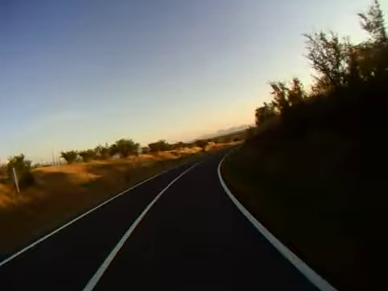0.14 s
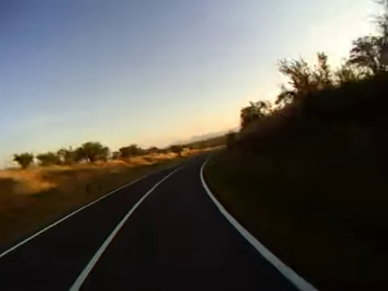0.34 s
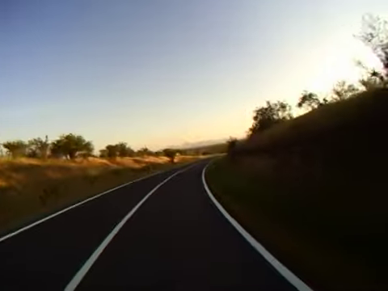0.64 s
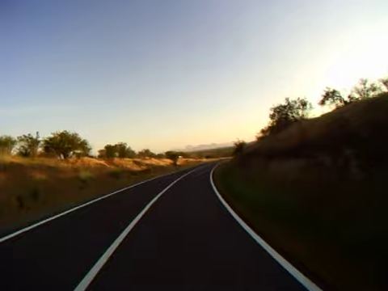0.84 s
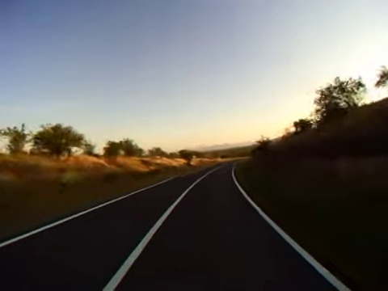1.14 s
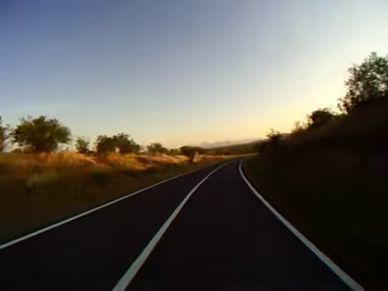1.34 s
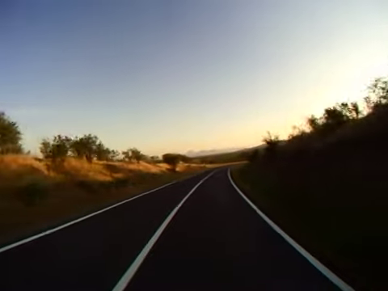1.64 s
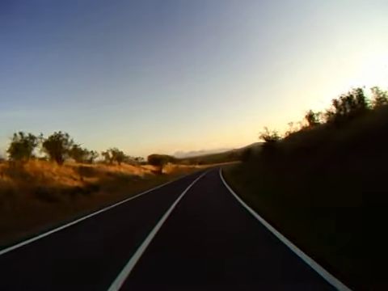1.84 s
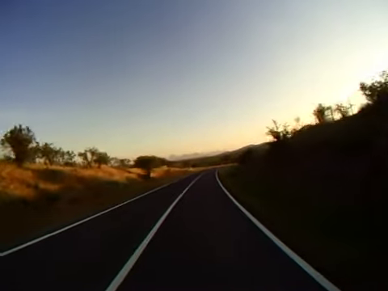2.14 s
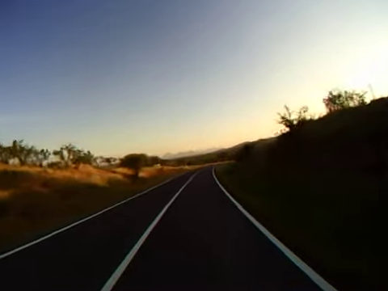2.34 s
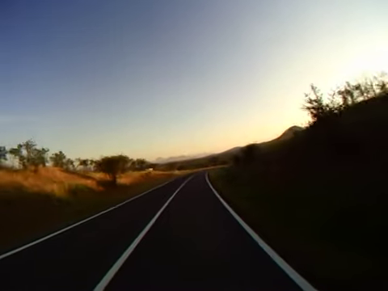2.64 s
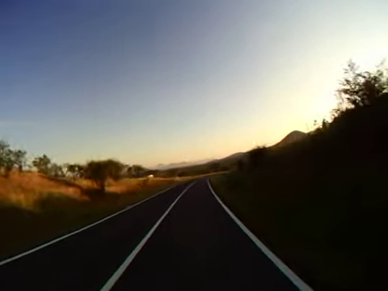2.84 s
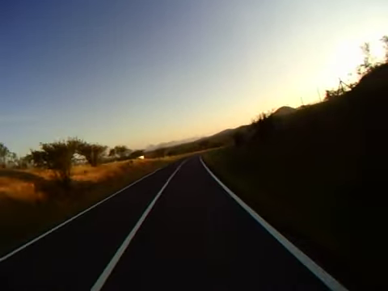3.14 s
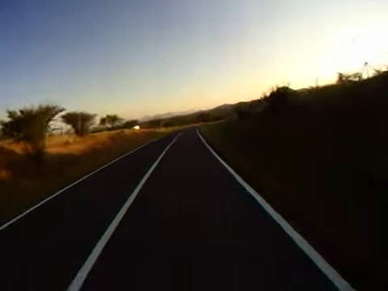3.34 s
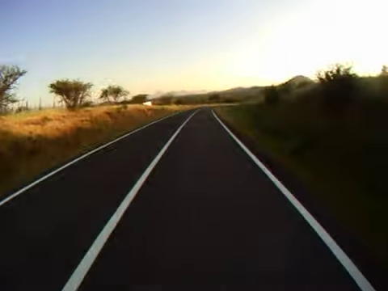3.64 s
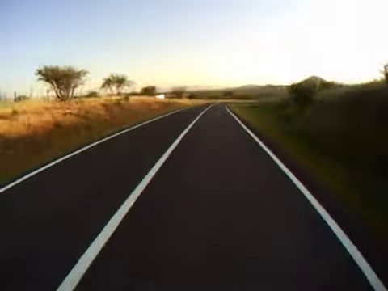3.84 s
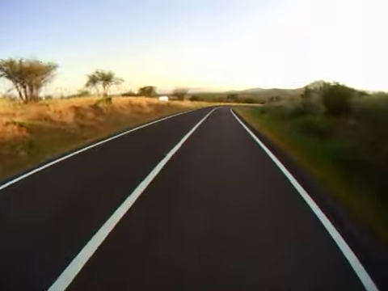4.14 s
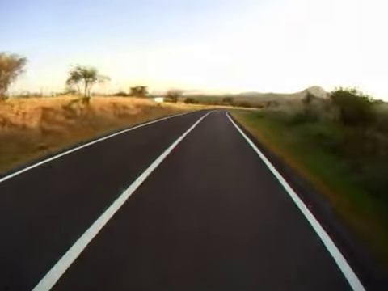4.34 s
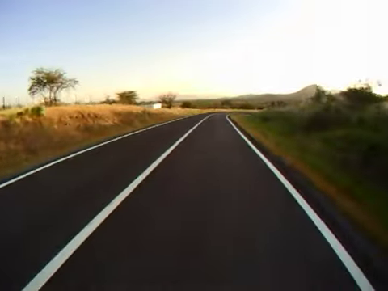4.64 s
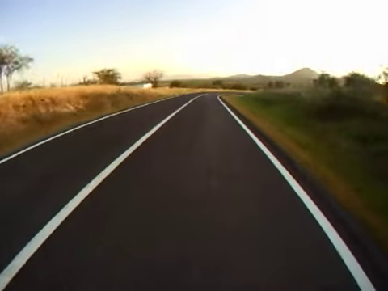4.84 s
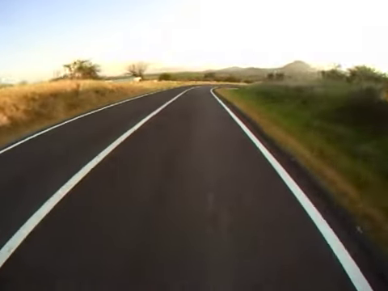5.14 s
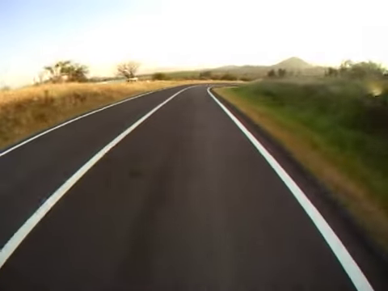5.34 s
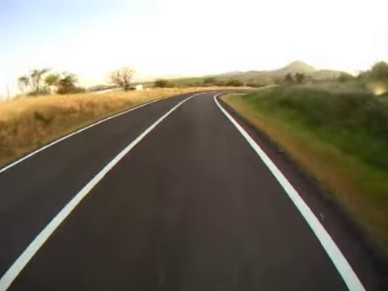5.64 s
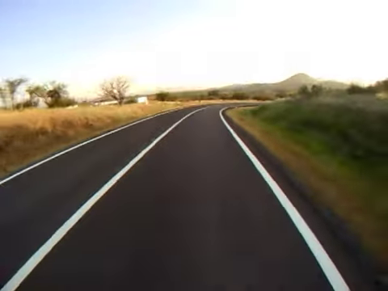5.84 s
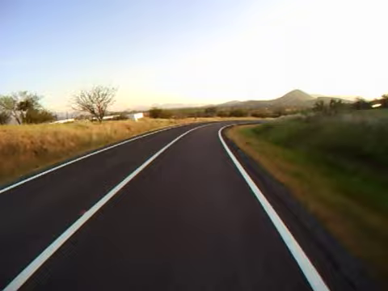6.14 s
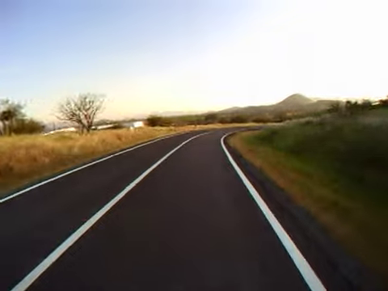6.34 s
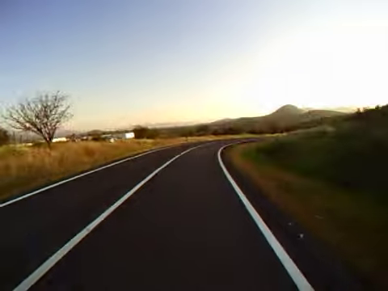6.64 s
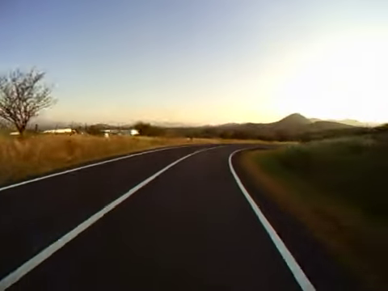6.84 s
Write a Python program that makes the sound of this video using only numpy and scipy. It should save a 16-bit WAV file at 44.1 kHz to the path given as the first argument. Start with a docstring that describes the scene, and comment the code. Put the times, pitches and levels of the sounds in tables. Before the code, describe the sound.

Wind buffets the microphone as a skateboard rumbles and hisses along a rough road, with bumps and clacks early on.

```python
"""A longboard runs fast down coarse asphalt, heard from a camera riding along in a closed plastic case.
From the start, wind buffets the shell, the mount bounces, and grit drums on the wheels and rings the board.
In the first four seconds bumps thump the mount; hard ones make the camera clack in its case, and the
hardest overload the recorder. The roll is loudest near 3 s, sinks until about 5.5 s, then swells again
into one last soft bump."""
import sys
import numpy as np
from scipy import signal
from scipy.fft import rfft, irfft, next_fast_len
from scipy.io import wavfile

SR = 44100
rng = np.random.default_rng(int(sys.argv[2]) if len(sys.argv) > 2 else 0)


def master(y):
    """Save y as 16-bit WAV."""
    cut = np.clip(np.atleast_2d(y).T, -1, 1)
    pcm = np.round(cut * 32767)  # scale
    wavfile.write(sys.argv[1], SR, pcm.astype(np.int16))


N = 307818
TIME = np.arange(N) / SR
USUAL_ROLL_DB = -27   # rolling level on ordinary asphalt


def from_db(db):
    """Decibels as a gain."""
    return 10 ** (np.asarray(db) / 20)


def unit_rms(x):
    """The signal scaled to rms 1."""
    return x / np.sqrt(np.mean(x ** 2) + 1e-20)


def automation(points):
    """A level curve drawn through its points, at every sample."""
    times, levels = np.transpose(points)
    return np.interp(TIME, times, levels)


def cut(x, hz, kind, order=2):
    """Butterworth low- or high-pass."""
    return signal.sosfilt(signal.butter(order, hz, kind, fs=SR, output="sos"), x + 1e-18)


def drift(rate_hz):
    """Slow random modulation, rms 1."""
    return unit_rms(cut(rng.standard_normal(N + SR), rate_hz, "low")[SR:])


def noise(spectrum):
    """Noise shaped by an EQ curve, rms 1."""
    hz, db = np.transpose(spectrum)
    size = next_fast_len(N)
    bins = np.fft.rfftfreq(size, 1 / SR) + 1e-3
    gain = from_db(np.interp(np.log(bins), np.log(hz), db))
    return unit_rms(irfft(rfft(rng.standard_normal(size)) * gain, size)[:N])


def ring(force, modes):
    """Parallel resonators with relative levels; a unit click makes a ring about 1 high."""
    out, height = 0, 0
    for hz, width, db in modes:
        radius = np.exp(-np.pi * width / SR)
        gain = from_db(db) * (1 - radius ** 2)
        feedback = [1, -2 * radius * np.cos(2 * np.pi * hz / SR), radius ** 2]
        out = out + signal.lfilter([gain / 2, 0, -gain / 2], feedback, force + 1e-18)
        height += gain
    return out / height


def add(track, time, piece):
    """Mixes a short piece in at a time in seconds."""
    at = round(time * SR)
    track[at:at + len(piece)] += piece[:N - at]


# Level ride of the wind on the case: (time [s], level [dB])
WIND_LEVEL = [(0.0, -37), (0.52, -40.5), (1.52, -31.5), (1.88, -36.5), (2.47, -33.5), (3.58, -37.5),
              (3.95, -33), (6.67, -35.5), (6.98, -36.5)]
# Dark tone of the rushing air: (frequency [Hz], relative level [dB])
WIND_EQ = [(50, -15), (110, -2.5), (160, 2.5), (210, -3), (300, -4), (365, -9), (428, -4), (475, -16),
           (515, -10), (565, -35.5), (900, -41.5), (2000, -60)]
# Boom of mount and shell, shared with the bumps: (frequency [Hz], bandwidth [Hz], relative level [dB])
MOUNT_MODES = [(75.8, 13, 11), (161, 49, 2), (268.5, 48, 6), (407.4, 26.6, 5), (484, 22, -29.5)]
def wind_buffeting(shell_db=-6.0, air_db=-0.6, gust_db=1.0):
    """Gusts press on the case and stir the low modes of its mount."""
    pressure = cut(rng.standard_normal(N), 130, "high", order=4)
    pressure = cut(pressure, 500, "low", order=10)
    shell = from_db(shell_db) * unit_rms(ring(pressure, MOUNT_MODES))
    air = from_db(air_db) * noise(WIND_EQ)
    return (shell + air) * from_db(automation(WIND_LEVEL) + gust_db * drift(rate_hz=20))


# Low-end bed of the shaking mount: (frequency [Hz], relative level [dB])
RUMBLE_EQ = [(8, -19), (20, -11), (35, -8.5), (52, -6), (66, -1.5), (78, -10.5), (90, -11.5), (105, -18.5),
             (200, -26.5), (500, -41.5)]
def mount_bounce(roughness_db, level_db=-28, drone_hz=74, wander_hz=3.44, drone_db=-5.0, swell_db=0.5):
    """The road keeps the mount swinging near its lowest mode, over a broader rumble."""
    pitch_hz = drone_hz + wander_hz * drift(rate_hz=13)
    phase = 2 * np.pi * np.cumsum(pitch_hz) / SR
    swell = from_db(-swell_db * drift(rate_hz=3.7))
    drone = from_db(drone_db) * unit_rms(np.sin(phase) * swell)
    return from_db(level_db + roughness_db) * (drone + noise(RUMBLE_EQ))


# Level ride of the wheels drumming on the road; it also drives the bounce: (time [s], level [dB])
ROLL_LEVEL = [(0.0, -27), (0.58, -30), (1.92, -25), (2.31, -24), (2.93, -23.5), (3.5, -30.5), (4.2, -32),
              (4.61, -29.5), (5.4, -36.5), (5.7, -36), (6.75, -28), (6.98, -28.5)]
# Ring of wheels, trucks and deck: (frequency [Hz], bandwidth [Hz], relative level [dB])
BOARD_MODES = [(769, 34, -2.5), (1297, 46, -5), (1450, 110, -1), (1590, 160, -9), (1825, 220, -9.5),
               (2365, 92, -1.5), (2431, 59, -1), (2864, 120, -10), (3022, 98, -8), (3607, 55, -6),
               (3546, 140, -14.5)]
# Tone of the rolling hiss: (frequency [Hz], relative level [dB])
HISS_EQ = [(450, -23.5), (600, -20.5), (690, 4), (900, 5), (1100, -7), (1500, 8), (2100, 2.5), (2800, -6.5),
           (3400, -8), (3800, -9), (4000, -17.5), (4300, -3.5), (4600, -22), (6000, -49)]
def wheels(roughness_db, stones_per_s=5000, size_db=2.0, hiss_db=-9.0, leak_db=-29, patch_db=0.5,
           urethane_hz=3740, deck_hz=1000, treble_hz=3300, trim_db=0.33):
    """Stones of uneven size strike the wheels and ring the board; coarser road is louder and brighter."""
    sizes = from_db(size_db * np.minimum(rng.exponential(1, N), 5))
    polarity = rng.choice([-1, 1], N)
    grit = sizes * polarity * (rng.random(N) < stones_per_s / SR)
    roll = unit_rms(ring(grit, BOARD_MODES)) + from_db(hiss_db) * noise(HISS_EQ)
    # Soft urethane swallows the finest grit: only a faint hiss lies above it.
    roll = cut(roll, urethane_hz, "low", order=36) + from_db(leak_db) * noise(HISS_EQ)
    # Two shelves: a rougher ride tilts the tone from the deck's low ring toward the treble.
    deck_gain, treble_gain = from_db(-0.44 * roughness_db), from_db(0.67 * roughness_db)
    roll = deck_gain * cut(roll, deck_hz, "low", order=5) + cut(roll, deck_hz, "high", order=5)
    roll = cut(roll, treble_hz, "low", order=7) + treble_gain * cut(roll, treble_hz, "high", order=7)
    patches_db = patch_db * drift(rate_hz=27)   # rougher and smoother patches of asphalt
    return roll * from_db(USUAL_ROLL_DB + roughness_db + trim_db + patches_db)


# Cues for the bumps in the road: (time [s], relative force [dB], contact length [s])
BUMP_CUES = [(0.294, -16.5, 0.0042), (0.5032, -1, 0.00093), (0.76, -13.5, 0.0041), (1.1593, -1, 0.0015),
             (1.4262, -9, 0.0016), (1.905, -21.5, 0.0026), (2.1692, -8, 0.002), (2.608, -18.5, 0.0024),
             (2.987, -19.5, 0.0023), (3.3475, -9, 0.0018), (3.7101, -13, 0.0028), (4.747, -27, 0.004),
             (6.719, -20.5, 0.0024)]
def bumps(level_db=5.5, jolt_delay_s=0.0145, jolt_db=-15.5):
    """Each bump thumps the mount with one smooth push; a longer contact sounds duller."""
    force = np.zeros(N)
    unit_push_samples = SR * 0.00057
    for time, db, contact_s in BUMP_CUES:
        half_sine = np.sin(np.pi * np.minimum(TIME[:SR // 50] / contact_s, 1))
        push = -from_db(db + level_db) * half_sine / unit_push_samples
        add(force, time, push)
        add(force, time + jolt_delay_s, from_db(jolt_db) * push)   # a weaker jolt, one swing later
    return ring(force, MOUNT_MODES)


# Cues for the camera hitting its case: (time [s], relative level [dB], chatter length [s], pitch [Hz])
CLACK_CUES = [(0.5035, 3, 0.0074, 2302), (1.1591, 10, 0.0042, 2430), (1.4135, -0.5, 0.0075, 2970),
              (1.4198, 1.5, 0.0041, 2470), (2.1713, -2.5, 0.0043, 2450), (3.3495, -9, 0.0066, 2400),
              (3.704, -17.5, 0.0042, 2290)]
def camera_strikes(rebound_s=0.0065, loss_db=15.5, rebound_pitch_ratio=0.39):
    """Yields each strike and its two rebounds: the camera falls back weaker and duller."""
    for time, db, chatter_s, hz in CLACK_CUES:
        yield time, db, chatter_s, hz
        for k in (1, 2):
            yield time + k * rebound_s, db - k * loss_db, chatter_s, hz * rebound_pitch_ratio


# Ring of the plastic case: (frequency [Hz], bandwidth [Hz], relative level [dB])
CASE_MODES = [(834, 47, 5.5), (1040, 400, -9.5), (1586, 800, 5.5), (2370, 72, 12.5), (3220, 190, -0.5),
              (3300, 215, -39.5)]
def case_clacks(chatter=0.077, crack_db=5.5, squeak_db=-5.5, case_db=2.0, crack_width_hz=1500):
    """A hard contact chatters briefly: a dry crack, a short squeak of plastic and the ring of the case."""
    track, t = np.zeros(N), TIME[:SR // 20]
    for time, db, chatter_s, hz in camera_strikes():
        contact = np.exp(-(t / chatter_s) ** 2)
        force = chatter * rng.standard_normal(len(t)) * contact
        force[0] = 1   # the attack click
        crack = from_db(crack_db) * ring(force, [(hz, crack_width_hz, 0)])
        squeak = from_db(squeak_db) * contact * np.sin(2 * np.pi * hz * t)
        body = from_db(case_db) * ring(force, CASE_MODES)
        add(track, time, from_db(db) * (crack + squeak + body))
    return cut(track, 3700, "low", order=4)


def scene():
    """Mono mix: the road drives both wheels and bouncing mount, with wind behind and knocks on top."""
    roughness_db = automation(ROLL_LEVEL) - USUAL_ROLL_DB
    ride = wheels(roughness_db) + mount_bounce(roughness_db)
    return (ride + wind_buffeting() + bumps() + case_clacks())[None]


def record(dry, input_ceiling=0.59, output_ceiling=0.72, band_hz=4720, top_hz=15800):
    """A narrow-band recorder: loud hits clip at its input, and their overshoot clips again at the output."""
    lowpass = signal.cheby2(16, 60, band_hz, fs=SR, output="sos")
    narrow = signal.sosfilt(lowpass, np.clip(dry, -input_ceiling, input_ceiling))
    clipped = np.clip(narrow, -output_ceiling, output_ceiling)
    return cut(clipped, top_hz, "low", order=16)


dry = scene()
out = record(dry)
master(out)
```